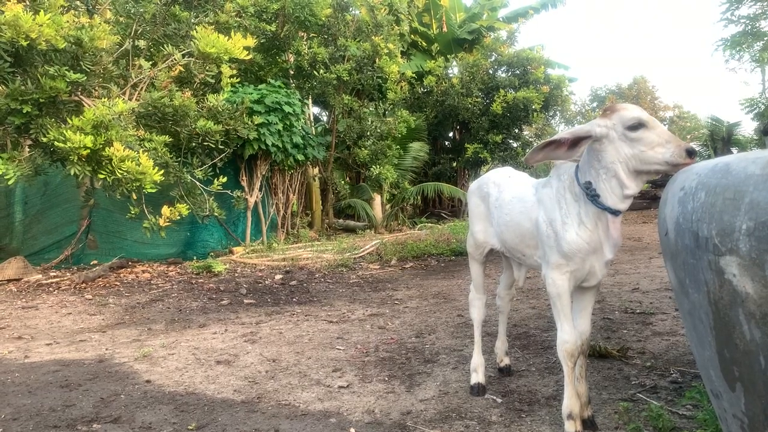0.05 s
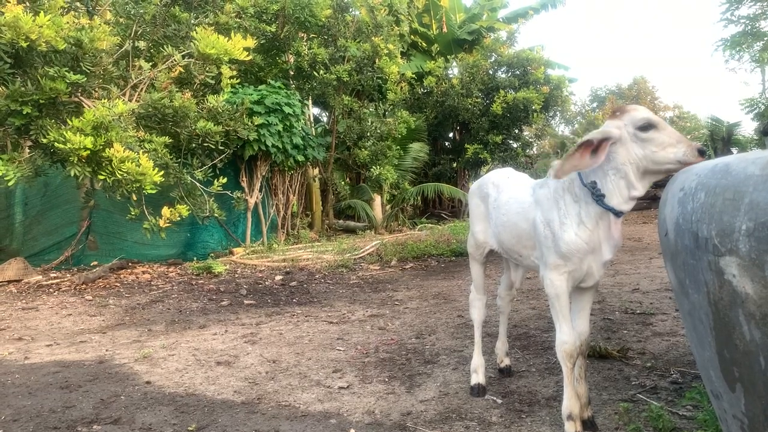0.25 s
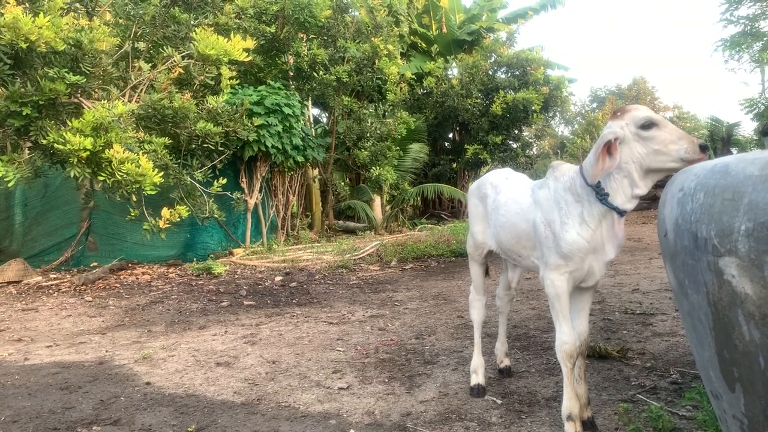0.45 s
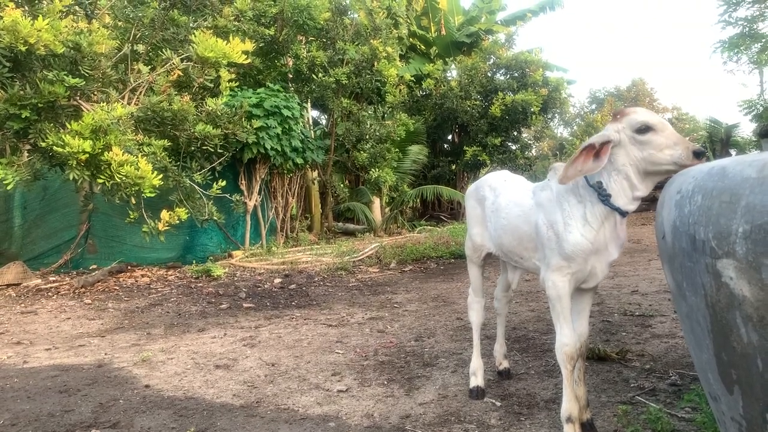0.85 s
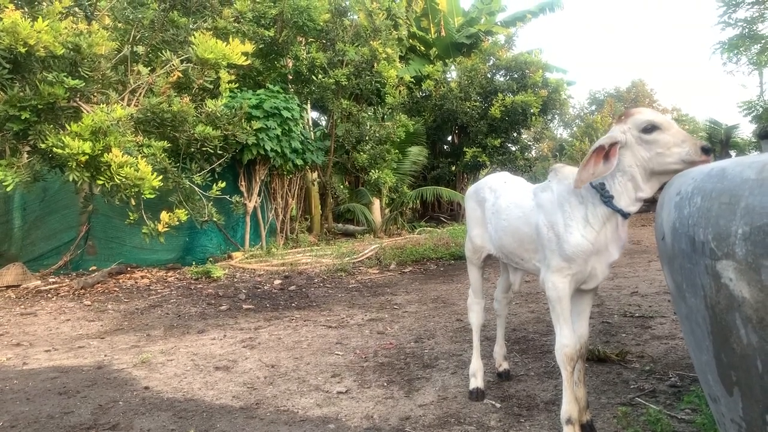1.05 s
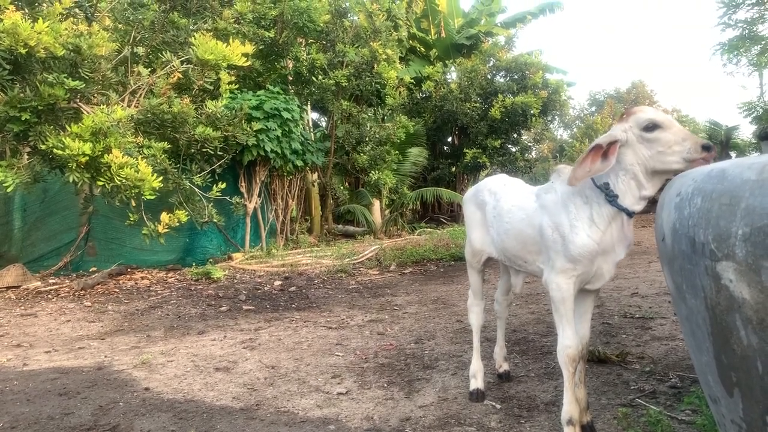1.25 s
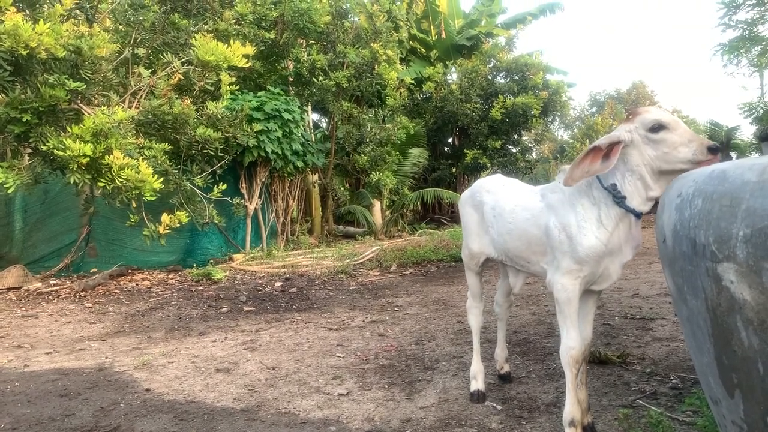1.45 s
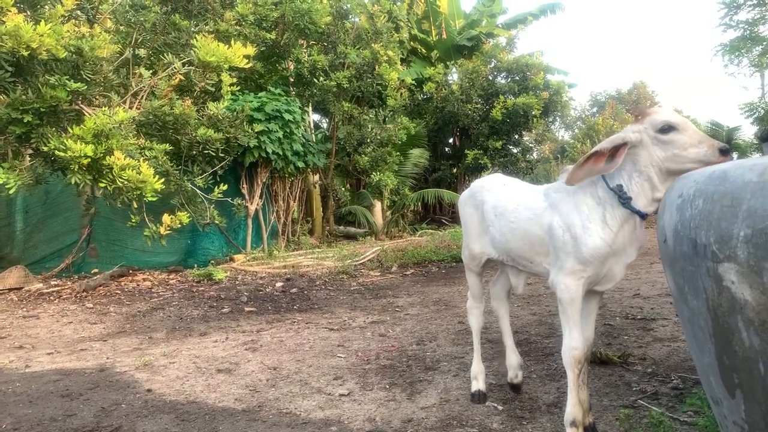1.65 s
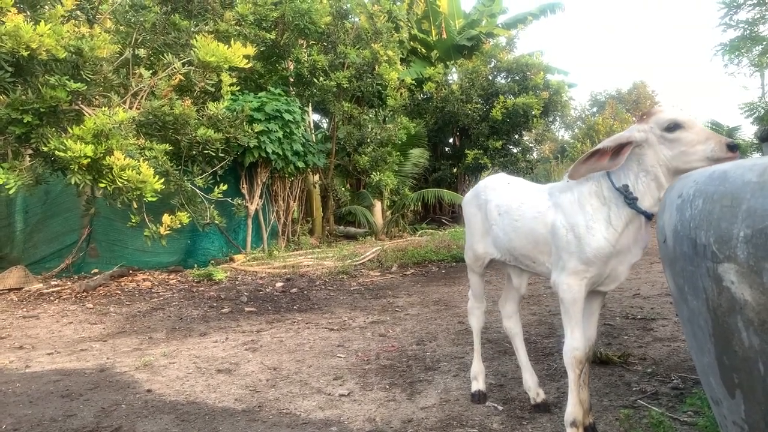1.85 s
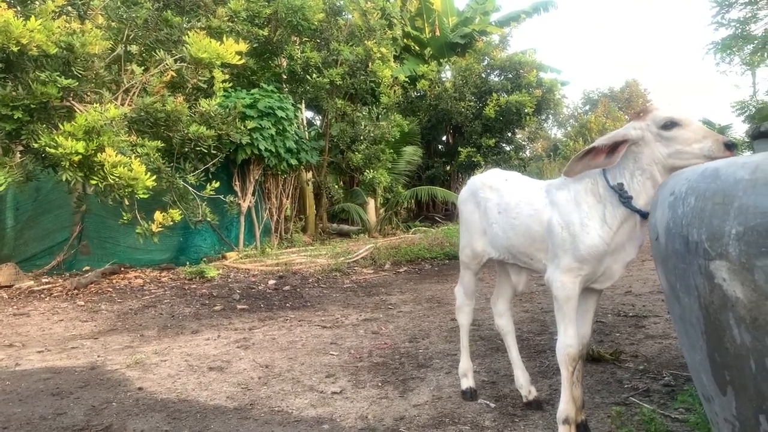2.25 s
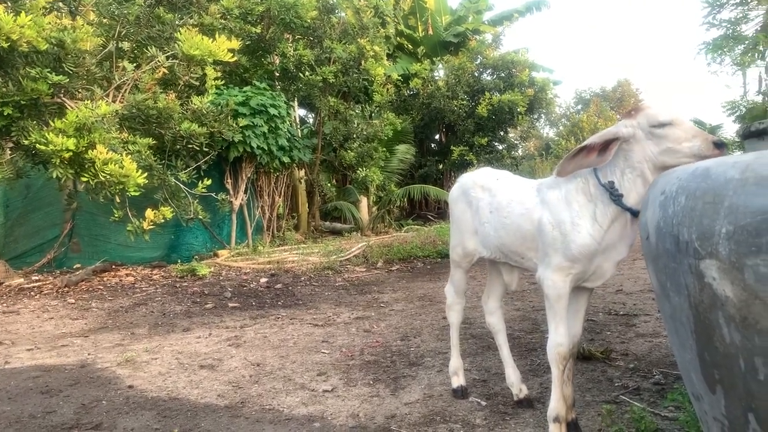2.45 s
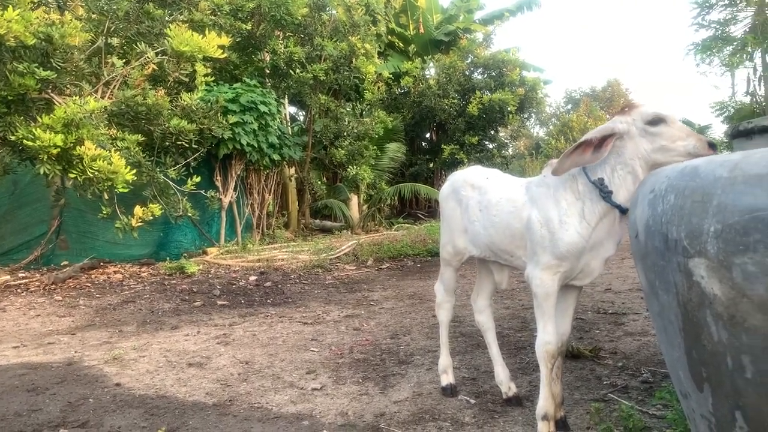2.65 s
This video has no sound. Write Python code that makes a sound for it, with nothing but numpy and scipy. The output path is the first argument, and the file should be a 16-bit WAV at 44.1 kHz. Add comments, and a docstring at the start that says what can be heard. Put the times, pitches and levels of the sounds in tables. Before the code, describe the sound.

Short squeaky chirps come close by on the left, some ending in a smacking rasp, while small birds call in the trees of a quiet farmyard. Later a calf nudges a tub, making a few soft, low knocks.

```python
"""A quiet farmyard. From the start, a low distant rumble and hum lie under leaf hiss and soft rustles,
and small birds call in the trees. From 0.3 s, short squeaky chirps (gliding harmonic tones) come close
by on the left, some dropping in pitch and ending in a smacking rasp of resonant noise. Faint far-off
whistles join at 0.5 s. From 1.6 s a few soft knocks, probably a calf nudging a tub, ring its low
modes; the loudest come near the end."""
import sys
import numpy as np
from scipy import signal
from scipy.fft import rfft, irfft
from scipy.io import wavfile
from scipy.ndimage import map_coordinates

SR = 44100
rng = np.random.default_rng(int(sys.argv[2]) if len(sys.argv) > 2 else 0)


def store_pcm(level_fs):
    """Save levels as 16-bit WAV."""
    pcm = np.round(np.clip(level_fs, -1, 1) * 32767).astype(np.int16)
    wavfile.write(sys.argv[1], SR, np.atleast_2d(pcm).T)


N = 123479
TIME_S, BIN_HZ = np.arange(N) / SR, np.arange(N // 2 + 1) * SR / N


def undb(db):
    """Decibel law: amplitude grows tenfold every 20 dB."""
    return 10 ** (np.asarray(db) / 20)


def unit(x):
    """Normalisation to an rms of 1."""
    return x / np.sqrt(np.mean(x ** 2) + 1e-20)


def add(out, start_s, x):
    """Superposition: a sound adds to the mix from its start time."""
    i = max(int(start_s * SR), 0)
    out[i:i + len(x)] += x[:max(len(out) - i, 0)]


def by_hz(points):
    """Interpolation of (frequency_hz, value) points on a logarithmic frequency axis."""
    hz, value = np.array(points, float).T
    return np.interp(np.log(BIN_HZ + 1e-3), np.log(np.maximum(hz, 1)), value)


def filtered(x, colour):
    """Zero-phase filtering by a curve of (frequency_hz, gain_db) points."""
    return irfft(rfft(x) * undb(by_hz(colour)), N)


def noise(colour):
    """Spectral shaping: white noise takes on a colour, at unit rms."""
    return unit(filtered(rng.standard_normal(N), colour))


def wander(rate_hz, size=N):
    """Random modulation: a smooth curve through Gaussian values, with a spread near 1."""
    at = np.arange(size) / SR * rate_hz
    return map_coordinates(rng.standard_normal(4096), [at], order=3, mode="wrap")


def burst(peak_s, rise_s, decay_s):
    """Exponential growth to a peak, then exponential decay."""
    t = TIME_S - peak_s
    return np.exp(-np.maximum(t / decay_s, -t / rise_s))


def glide(length_s, pitches_hz, jitter):
    """Frequency modulation: progress (0-1) and phase along a jittering parabola through three pitches."""
    progress = np.linspace(0, 1, int(length_s * SR))
    arch_hz = np.polyval(np.polyfit([0, .5, 1], pitches_hz, 2), progress)
    hz = arch_hz * (1 + jitter * wander(rate_hz=903, size=len(progress)))
    return progress, 2 * np.pi * np.cumsum(hz) / SR


# Spectrum of rumble and leaf hiss: frequency_hz, gain_db
AIR_COLOUR = [(25, -9.5), (45, 2.5), (75, -4), (110, -5), (160, -14), (230, -18), (330, -25.5), (480, -35),
              (750, -40.5), (1300, -43.5), (2400, -42), (3400, -34.5), (4800, -37), (6300, -34.5),
              (7500, -52), (8700, -58), (14000, -57), (15500, -81)]
# Likeness of the air at the two ears: frequency_hz, correlation
AIR_COHERENCE = [(60, 0.89), (200, 1), (500, 0.93), (1000, 0), (3000, 0), (12000, 0.11)]

def air():
    """Interaural coherence: the rumble is alike at both ears, the leaf hiss nearly independent."""
    coherence = np.clip(by_hz(AIR_COHERENCE), -.99, .99)
    mid = irfft(rfft(noise(AIR_COLOUR)) * np.sqrt((1 + coherence) / 2), N)
    side = irfft(rfft(noise(AIR_COLOUR)) * np.sqrt((1 - coherence) / 2), N)
    level_db = -47 + 0.81 * wander(rate_hz=7.6)
    return undb(level_db) * np.array([mid + side, mid - side])


# Course of the far hum: time_s, level_db
HUM_ENVELOPE = [(0, -56.5), (.25, -41.5), (.65, -44), (1.001, -47.5), (1.3, -46), (1.6, -63), (2.1, -48),
                (2.45, -58.5), (2.8, -50)]

def hum(pitch_hz=69.4, octave_db=-14.5):
    """Slow modulation: a far tone and its octave waver in pitch and level."""
    phase = 2 * np.pi * np.cumsum(pitch_hz * (1 + 0.026 * wander(rate_hz=16))) / SR
    level_db = np.interp(TIME_S, *np.array(HUM_ENVELOPE).T) + 1.8 * wander(rate_hz=15.26)
    return undb(level_db) * (np.sin(phase) + undb(octave_db) * np.sin(2 * phase))


# Spectrum of the midrange wash: frequency_hz, gain_db
WASH_COLOUR = [(250, -18), (450, 8.5), (800, 2), (1600, 4.5), (2600, -4), (4000, -35.5)]
# Its ebb and return: time_s, level_db
WASH_ENVELOPE = [(0, -57), (.3, -69.5), (.6, -66), (1.1, -70.5), (1.55, -74.5), (1.75, -81.5),
                 (1.95, -84.5), (2.08, -75), (2.3, -76), (2.8, -71)]

def wash():
    """Decorrelation: separate noise at each ear makes a diffuse midrange background."""
    level_db = np.interp(TIME_S, *np.array(WASH_ENVELOPE).T)
    return undb(level_db) * np.array([noise(WASH_COLOUR), noise(WASH_COLOUR)])


def flicker(x, depth_db=1.3):
    """Amplitude modulation: each third of an octave above the bass wavers on its own."""
    centres_hz = 500 * 2 ** (np.arange(15) / 3)
    spectrum, out = rfft(x), x.copy()
    for below, hz, above in zip(centres_hz, centres_hz[1:], centres_hz[2:]):
        band = irfft(spectrum * by_hz([(below, 0), (hz, 1), (above, 0)]), N)
        out += band * (undb(depth_db * wander(rate_hz=18)) - 1)
    return out


# Spectrum of rustles and of scrapes on the tub: frequency_hz, gain_db
FRICTION_COLOUR = [(300, 2), (700, 7), (1300, -14.5), (1950, 7), (2600, -0.5), (3200, 6.5), (4200, -11.5),
                   (7000, -18), (14000, -60)]
# Soft brushes: peak_s, level_db, rise_s, decay_s
RUSTLE_BURSTS = [(0.019, -60.5, 0.034, 0.015), (0.085, -58.5, 0.018, 0.0048), (1.174, -58, 0.0022, 0.0062),
                 (1.286, -64, 0.0012, 0.0034), (2.487, -61.5, 0.006, 0.04)]

def rustles():
    """Friction noise: brief soft brushes swell and die away."""
    envelope = sum(undb(db) * burst(*timing) for peak_s, db, rise_s, decay_s in RUSTLE_BURSTS
                   for timing in [(peak_s, rise_s, decay_s)])
    return noise(FRICTION_COLOUR) * envelope


# Birds in the trees: start_s, length_s, start_hz, middle_hz, end_hz, level_db, roughness
BIRD_NOTES = [ (.135, 0.03, 2130, 2276, 2500, -63, 0.37), (.205, 0.035, 4600, 5830, 6880, -57.5, .7),
              (.140, 0.099, 7750, 7470, 7700, -73, 0.1), (.212, 0.026, 2540, 2604, 2700, -61.5, 0.1),
              (.316, 0.028, 5580, 5540, 5100, -54.5, 0.2), (.725, 0.034, 4390, 3960, 3450, -65, 0.4),
              (.755, 0.098, 2850, 2445, 2230, -62, .3), (.795, 0.088, 4900, 4410, 4100, -61, 0.08),
              (.940, 0.056, 4550, 4500, 4480, -57.5, 0.3), (.965, 0.1, 4257, 4130, 3784, -53, 0.38),
              (1.158, 0.027, 6000, 5410, 4800, -54.5, 0.23), (1.165, 0.084, 4100, 3880, 3350, -61, .5),
              (1.245, 0.062, 4410, 4580, 3250, -62.5, 0.58), (1.480, 0.041, 4900, 6190, 7540, -57, .7),
              (1.710, 0.018, 4510, 4900, 5600, -57.5, .5), (1.750, 0.031, 5220, 4960, 4600, -64, .3),
              (1.947, .028, 5590, 5565, 5000, -52, .25), (1.965, 0.035, 5000, 4410, 3620, -59.5, 0.37),
              (2.005, 0.022, 3460, 3480, 4300, -58.5, 0.25), (2.000, 0.091, 5290, 4590, 4180, -62.5, 0.34),
              (2.090, 0.014, 3340, 3830, 4600, -51.5, 0.2), (2.163, 0.035, 5110, 4950, 4630, -64, 0.2),
              (2.200, 0.041, 5210, 4880, 4630, -64, 0.12), (2.495, 0.053, 4520, 4380, 4100, -65, 0.1),
              (2.556, 0.024, 5800, 5570, 5260, -56.5, 0.12), (2.555, 0.065, 4700, 4700, 4240, -58, 0.88),
              (2.650, 0.045, 4290, 4810, 4900, -71, 0.17)]

def whistles(notes=BIRD_NOTES):
    """Frequency jitter spreads a tone into sidebands: gliding bird notes range from pure to buzzy."""
    out = np.zeros(N)
    for start_s, length_s, *pitches_hz, level_db, roughness in notes:
        progress, phase = glide(length_s, pitches_hz, jitter=0.116 * roughness)
        add(out, start_s, np.sqrt(2) * undb(level_db) * np.sin(np.pi * progress) * np.sin(phase))
    return out


def twitter(chips_per_s=22, length_s=.035, low_hz=3200, high_hz=5200, roughness=.4):
    """Downward frequency sweeps: many faint, irregular chips from deep in the trees."""
    notes = []
    for slot, (when, pitch, slide, size) in enumerate(rng.random((int(chips_per_s * N / SR), 4))):
        hz = low_hz + pitch * (high_hz - low_hz)
        bend = .075 * (1 + slide)
        pitches_hz = hz * (1 + bend), hz, hz * (1 - bend)
        level_db = -67 + 2.5 * (2 * size - 1)
        notes.append(((slot + when) / chips_per_s, length_s, *pitches_hz, level_db, roughness))
    return whistles(notes)


# Near chirps: start_s, length_s, start_hz, middle_hz, end_hz, level_db,
# second_harmonic_db, roughness, peak_fraction
SQUEAK_NOTES = [ (0.327, 0.02, 2420, 2780, 2800, -40.5, -32, 0.24, 0.6),
                (0.334, 0.027, 3550, 3454, 3170, -30.5, -32, 0.25, 0.65),
                (0.349, 0.051, 1926, 1753, 1677, -39, -1.5, 0.18, 0.35),
                (0.415, 0.03, 2172, 2160, 2000, -45, -8, 0.08, 0.3),
                (0.462, 0.024, 2143, 2435, 2310, -22.5, -8.5, 0.31, 1),
                (0.478, .015, 4180, 4191, 4250, -27, -38, 0.14, 0.5),
                (0.477, 0.0168, 1750, 1603, 1570, -34.5, 8.5, 0.35, 0.6),
                (0.844, 0.019, 1780, 1737, 1840, -34.5, 1.5, 0.2, 0.6),
                (0.847, 0.02, 964, 1070, 1310, -41, -26, 0.5, 0.59),
                (0.863, 0.037, 1412, 1368, 1360, -55.5, 2, 0.14, 0.62),
                (1.078, 0.026, 2030, 2256, 2550, -41, -50, 0.25, 0.99),
                (1.093, 0.016, 2020, 1764, 1740, -47, 0, 0.3, 0.67),
                (1.392, 0.031, 2967, 3108, 3120, -37, -33, 0.06, 0.76),
                (1.417, 0.031, 2640, 2620, 2540, -49.5, -7, 0, .35),
                (1.42, 0.029, 2290, 2090, 1770, -53, 3.5, 0.83, 0.65),
                (1.666, 0.044, 2365, 2580, 2430, -45.5, -43, 0, 0.59),
                (1.709, 0.018, 2090, 2404, 2560, -33.5, -31, 0.21, 0.76),
                (1.716, 0.027, 2710, 2963, 2080, -35, -37, 0, 0.42),
                (2.113, 0.051, 2480, 2664, 2247, -39, -32, 0.01, 0.91),
                (2.315, 0.035, 2204, 3000, 2990, -29, -24, 0.46, 0.83),
                (2.326, 0.029, 1777, 1696, 1603, -33.5, 1, 0.27, 0.63),
                (2.564, 0.025, 1910, 2454, 2130, -31.5, -46, 0.04, 0.81),
                (2.584, 0.01, 1850, 1576, 1420, -46, -11, 0.4, 0.42)]

def squeaks(attack_s=0.0059, release_s=0.002, swell_db=21, harmonic_fall_db=22.5):
    """Harmonic series: each chirp swells and breaks off, roughened by jitter in pitch and amplitude."""
    out = np.zeros(N)
    for start_s, length_s, *pitches_hz, level_db, second_db, roughness, peak in SQUEAK_NOTES:
        progress, phase = glide(length_s, pitches_hz, jitter=0.12 * roughness)
        edge = np.clip(np.minimum(progress / attack_s, (1 - progress) / release_s) * length_s, 0, 1)
        envelope = undb(level_db - swell_db * abs(progress - peak)) * np.sin(edge * np.pi / 2) ** 2
        overtones = sum(undb(second_db - harmonic_fall_db * k) * np.sin((k + 2) * phase)
                        for k in range(4))
        shimmer = 1 + .5 * roughness * wander(rate_hz=903, size=len(progress))
        add(out, start_s, np.sqrt(2) * envelope * (np.sin(phase) + overtones) * shimmer)
    return out


def resonance(centre_hz, width_hz, gain_db):
    """Lorentzian response of one damped resonator."""
    return undb(gain_db) / (1 + 1j * (BIN_HZ - centre_hz) / (width_hz / 2))


# Resonances common to all rasps: centre_hz, width_hz, gain_db
RASP_RESONANCES = [(1046, 360, 29), (1652, 76, 16.5), (2230, 86, 23.5), (2715, 300, 20), (3670, 120, 14.5),
                   (3850, 190, 4), (4128, 21, 9.5), (4500, 97, -2)]

def ringing(x):
    """Parallel resonators colour a sound while its power is kept."""
    response = 1 + sum(resonance(*mode) for mode in RASP_RESONANCES)
    return unit(irfft(rfft(x) * response, N)) * np.std(x)


# Spectra of the rasp's excitation and of its bright snap: frequency_hz, gain_db
RASP_COLOUR = [(300, -13), (600, -12.5), (1100, -17.5), (1700, -5), (3300, -5.5), (4700, 2), (6500, -1.5),
               (9000, -25), (14000, -26), (16000, -40)]
SNAP_SPECTRUM = [(2000, -20), (5000, 12), (7000, -6.5), (10000, -4), (13500, -8.5), (16000, -20)]
# Smacking rasps: peak_s, level_db, rise_s, decay_s, low_resonance_hz, high_resonance_hz, snap_db
SMACK_BURSTS = [(0.364, -34.5, 0.012, 0.02, 2930, 3360, -52), (0.428, -42, 0.0058, 0.014, 4310, 6230, -95),
                (.490, -23, 0.007, 0.0024, 3650, 4080, -37), (0.867, -39, 0.0067, 0.015, 2740, 4070, -53.5),
                (2.124, -57, 0.0039, 0.0065, 700, 1620, -55.5),
                (2.347, -37.5, 0.0089, 0.015, 3060, 4590, -44)]

def smacks(grain_db=2, snap_decay_ratio=1.16):
    """Source and filter: grainy noise rings resonances, with a bright snap, as some chirps break off."""
    grain = unit(undb(grain_db * wander(rate_hz=1100)))
    spectrum, snap = rfft(ringing(noise(RASP_COLOUR))), noise(SNAP_SPECTRUM)
    out = np.zeros(N)
    for peak_s, level_db, rise_s, decay_s, *resonances_hz, snap_db in SMACK_BURSTS:
        peaks = sum(resonance(hz, width_hz=130, gain_db=14) for hz in resonances_hz)
        rasp = unit(irfft(spectrum * (1 + peaks), N))
        out += undb(level_db) * rasp * burst(peak_s, rise_s, decay_s)
        out += undb(snap_db) * snap * burst(peak_s, rise_s, snap_decay_ratio * decay_s)
    return out * grain


# Far-off calls: start_s, length_s, start_hz, middle_hz, end_hz, level_db, roughness
FAR_NOTES = [(.52, 0.28, 850, 823, 767, -74, 0.9), (.92, 0.2, 816, 750, 734, -71, 0.88),
             (1.05, 0.47, 1503, 1510, 1507, -75, 0.18), (1.18, 0.066, 965, 1037, 1110, -70.5, 0.4),
             (1.295, 0.059, 960, 1023, 1120, -70, 0.33), (1.40, 0.075, 983, 1075, 1150, -72, 0.4),
             (1.50, .06, 973, 1047, 1120, -75, .3), (1.67, 0.066, 920, 1092, 1110, -73.5, 0.25)]

def far_whistles():
    """Frequency glides: faint, lower and mostly longer notes from far off."""
    return whistles(FAR_NOTES)


# Modes of the tub: pitch_hz, relative_db, t60_s
TUB_MODES = [(215, 9.5, 0.054), (286, -21, 0.03), (402, 10.5, 0.033), (575, -2.5, 0.032), (735, -8, 0.03)]
# Bumps on the tub: start_s, thud_db, scrape_db
TUB_BUMPS = [(1.573, -56, -57.5), (2.124, -64, -52.5), (2.27, -50.5, -72), (2.623, -39.5, -53),
             (2.633, -36, -48.5), (2.735, -50, -91), (2.745, -35, -72)]

def knocks(attack_s=0.0013):
    """Modal vibration: soft bumps ring the tub's damped low modes, each with a little scrape."""
    out, t = np.zeros(N), np.arange(SR // 4) / SR
    ring = sum(undb(db) * np.sin(2 * np.pi * hz * t) * np.exp(-np.log(1000) * t / t60_s)
               for hz, db, t60_s in TUB_MODES)
    ring *= 1 - np.exp(-t / attack_s)
    scrape = noise(FRICTION_COLOUR)
    for start_s, thud_db, scrape_db in TUB_BUMPS:
        add(out, start_s, undb(thud_db) * ring / abs(ring).max())
        out += undb(scrape_db) * scrape * burst(start_s, rise_s=0.0041, decay_s=0.018)
    return out


def echoes(x, t60_s, gap_s):
    """Reverberation: after a gap, scattered reflections decay exponentially, different at each ear."""
    t = np.arange(SR) / SR
    onset = np.clip(t / gap_s - 1, 0, 1)
    tail = rng.standard_normal((2, SR)) * np.exp(-np.log(1000) * t / t60_s) * onset
    tail /= np.sqrt(np.sum(tail ** 2, axis=1, keepdims=True))
    return signal.fftconvolve(x[None], tail, axes=1)[:, :N]


# Response at the left ear: frequency_hz, gain_db
LEFT_EAR_COLOUR = [(700, 1), (1400, -3.5), (2400, -2), (4200, 1), (8000, -.5)]

def from_left(x, lag_s=.00045):
    """Interaural time difference: the sound reaches the left ear first, a little coloured."""
    right = map_coordinates(x, [np.arange(N) - lag_s * SR], order=3)
    return np.array([filtered(x, LEFT_EAR_COLOUR), right])


# Response of the yard's late reflections: frequency_hz, gain_db
YARD_COLOUR = [(200, -2), (700, 6), (1250, -14), (1650, 4), (2300, -6), (3200, 0), (4100, 4), (6500, -4),
               (12000, -13)]

def yard(chirps, bumps, ring_share=0.21):
    """Reflection: early echoes of the chirps, then a coloured tail of both chirps and knocks."""
    sent = filtered(ring_share * ringing(chirps) + (1 - ring_share) * chirps + bumps, YARD_COLOUR)
    early = undb(-8) * echoes(chirps, t60_s=0.11, gap_s=0.0017)
    return early + undb(-18) * echoes(sent, t60_s=0.38, gap_s=0.018)


def scene():
    """Superposition: near chirps and knocks in the yard, birds in the trees, and the background."""
    chirps = squeaks() + smacks()
    bumps = knocks()
    near = from_left(chirps) + bumps + yard(chirps, bumps)
    birds = whistles() + far_whistles()
    scattered = echoes(birds + twitter(), t60_s=.28, gap_s=0.0027)  # the twitter has no direct path
    trees = undb(-1) * birds + undb(3) * scattered
    return near + trees + flicker(rustles() + wash() + air() + hum())


def record(dry, low_cut_hz=47.3, high_cut_hz=14700):
    """Band limiting: steep filters remove the deepest rumble and the highest treble."""
    highpass = signal.butter(6, low_cut_hz, "highpass", fs=SR, output="sos")
    lowpass = signal.ellip(8, .2, 70, high_cut_hz, fs=SR, output="sos")
    return signal.sosfilt(lowpass, signal.sosfilt(highpass, dry))


dry = scene()
out = record(dry)
store_pcm(out)
```